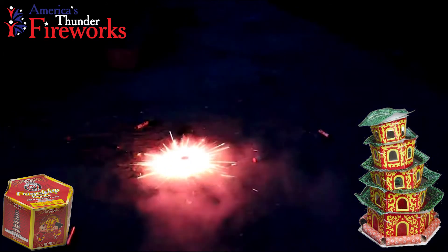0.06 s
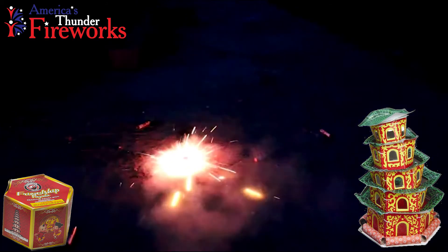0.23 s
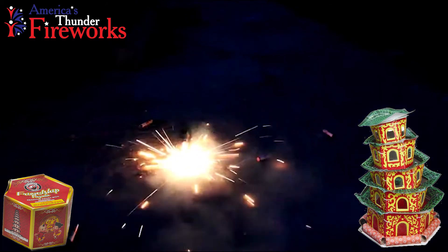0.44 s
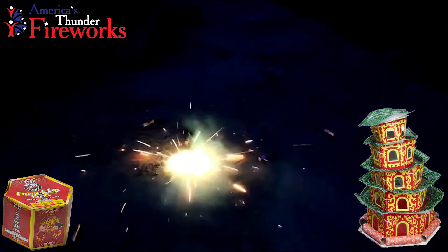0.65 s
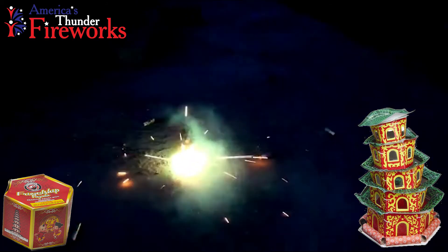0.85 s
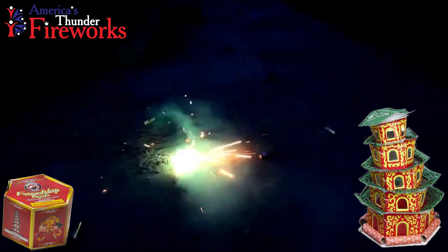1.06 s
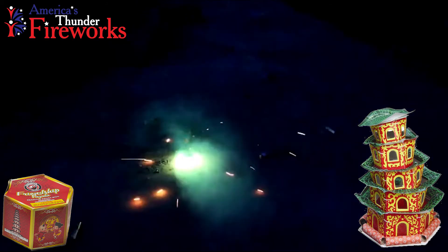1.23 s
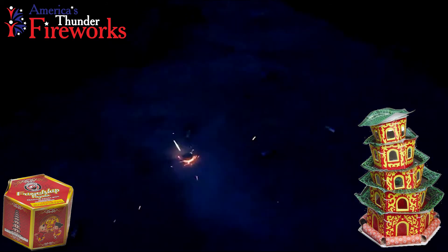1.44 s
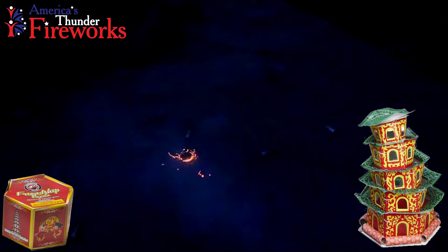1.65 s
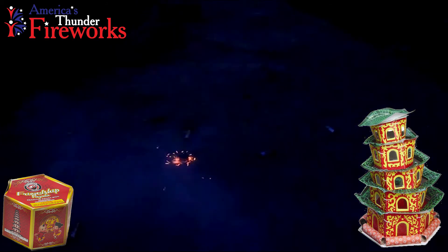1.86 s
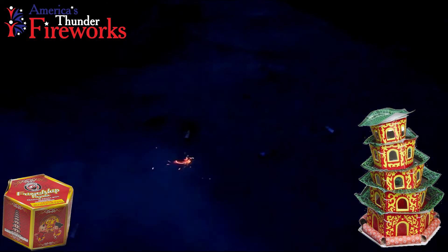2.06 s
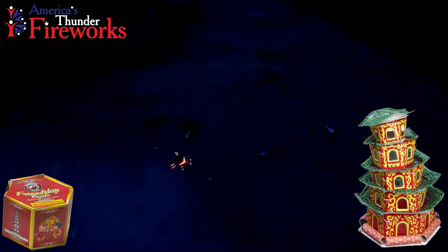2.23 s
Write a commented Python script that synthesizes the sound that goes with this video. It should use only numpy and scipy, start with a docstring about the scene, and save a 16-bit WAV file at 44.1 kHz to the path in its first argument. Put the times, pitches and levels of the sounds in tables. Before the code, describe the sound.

A ground spinner firework whirls with a fast pulsing hiss, then drops to a lower rush and sputters out in crackles. Sharp pops echo briefly in a paved lane at night, the loudest overloading the microphone.

```python
"""A paved lane at night: a ground spinner firework burns out. Its whirling jet hisses, one pulse a turn,
then slows to a low rush that breaks up into a sputter of tiny shocks and a few last cracks.
Lumps of powder pop on the way; the ground mirrors each, nearby walls echo it,
and the loudest overload the microphone. Faint night noise lies underneath."""
import sys
import numpy as np
from scipy import signal
from scipy.fft import rfft, irfft, next_fast_len
from scipy.io import wavfile
from scipy.ndimage import map_coordinates

SR = 44100
rng = np.random.default_rng(int(sys.argv[2]) if len(sys.argv) > 2 else 0)


def to_wav(s):
    """Save 16-bit WAV."""
    ch = np.atleast_2d(s).T  # columns
    pcm = np.round(np.clip(ch, -1, 1) * 32767)  # PCM
    wavfile.write(sys.argv[1], SR, pcm.astype(np.int16))


N = 101429

# casing spin, nozzle facing the listener at whole turns: time_s, turns
SPIN_TURNS = [(0, -.15), (.05, .95), (.1, 2.45), (.3, 8.35), (.48, 13.3), (.65, 18.25), (.75, 20.6),
              (.9, 24.5), (1.03, 27.3), (1.2, 31.1), (1.5, 35)]
# jet hiss: time_s, level_db
JET_LEVEL = [(0, -26), (.2, -25.5), (.32, -28.5), (.43, -26.5), (.52, -31), (.62, -26.5), (.78, -26),
             (.9, -25), (1.01, -23), (1.07, -33), (1.2, -35), (1.35, -44), (2.05, -85)]
# hiss swing over a turn: time_s, swing_db
JET_SWING = [(0, 1.5), (.25, 2.2), (.55, 2), (.72, 4.2), (.96, 4.4), (1.2, 1.5)]
# jet hiss: freq_hz, level_db
JET_SPECTRUM = [(300, -31), (1200, -14.5), (2200, -8), (3200, 0.5), (4500, -1), (6400, -2.5), (9000, -7.5),
                (12000, -14), (15500, -21)]
# powder pops: start_s, thump_db, pitch_hz, thump_t60_s, crack_db, crack_width_ms, burst_db, tail_db
POWDER_POPS = [(0.2216, -3.5, 162, 0.041, -0.5, 0.076, -20, -35),
               (0.4021, 19.5, 279, 0.019, 14.5, 0.37, -19, -7.5),
               (0.6995, -6.5, 134, 0.039, -35, 0.2, -32, -25.5),
               (.875, -26, 176, 0.028, -21, 0.31, -19, -29), (1.018, 8, 287, .021, 14, 0.186, 5, -11),
               (1.7649, 2.5, 259.9, .014, 9, 0.44, -3, -18.5),
               (2.016, -8.5, 174, 0.029, -33, 0.14, -43, -28.5)]
# gas burst of a pop: freq_hz, level_db
BURST_SPECTRUM = [(30, -16), (150, -14), (280, -8.5), (430, 0), (560, 6.5), (800, -8), (1000, -10.5),
                  (1450, -4), (2200, -23), (5000, -22.5), (10000, -58)]
# scattered tail of a pop: freq_hz, level_db
TAIL_SPECTRUM = [(40, -55), (130, -11), (280, 7.5), (480, 3.5), (800, -13), (1500, -12), (3000, -18),
                 (9000, -60)]
# nearby walls: delay_s, gain_db
WALL_ECHOES = [(.017, -26.5), (.031, -46), (.049, -41), (0.066, -27.5)]
# sputter before trim: time_s, level_db
SPUTTER_LEVEL = [(1.07, -33), (1.2, -25.5), (1.286, -18.5), (1.42, -16), (1.5, -19), (1.525, -18),
                 (1.565, -25.5), (1.602, -15.5), (1.68, -20.5), (1.728, -15), (1.785, -23), (1.81, -24),
                 (1.85, -19), (1.88, -21), (1.91, -20.5), (1.945, -22.5), (1.983, -17.5), (2.007, -21),
                 (2.025, -28)]
# sputter shocks: time_s, rate_per_s, width_ms
SPUTTER_GRAIN = [(0, 490, 0.095), (1.1, 1900, 0.062), (1.3, 2990, 0.14), (1.45, 2870, .12),
                 (1.55, 870, 0.065), (1.61, 1380, 0.07), (1.72, 2270, 0.065), (1.85, 900, .06),
                 (1.98, 894, 0.067)]
# ember cracks: start_s, level_db, width_ms
EMBER_CRACKS = [(1.1601, -7, 0.17), (1.4195, -3, 0.15), (1.5152, -2, 0.063), (1.528, -11, 0.046),
                (1.55, -3, .06), (1.6053, 3, 0.041), (1.9195, -1.5, 0.047), (2.0126, -13, 0.037),
                (2.017, -2.5, 0.075), (2.021, -5.5, 0.083), (2.0903, -6, 0.059), (2.1125, -3.5, 0.069),
                (2.116, -8.5, 0.077), (2.1242, -4.5, .06), (2.129, -9, 0.08), (2.1361, -2.5, 0.079),
                (2.1795, -5, 0.074), (2.2516, -18, .1), (2.2559, -12.5, 0.26)]
# flame roar: time_s, level_db
ROAR_LEVEL = [(0, -40), (.08, -27), (.17, -31), (.33, -32), (.5, -32.5), (.62, -35), (.77, -31),
              (.87, -22.5), (.97, -25), (1.08, -31), (1.28, -23), (1.45, -26), (1.6, -27.5), (1.85, -32.5),
              (2.01, -35), (2.08, -38), (2.3, -46)]
# flame roar: freq_hz, level_db
ROAR_SPECTRUM = [(60, -50), (130, -2), (260, 1.5), (480, -4), (750, -7), (1200, -5.5), (2200, -13.5),
                 (4000, -13.5), (10000, -57)]
# flame billows: time_s, level_db
BILLOW_LEVEL = [(0, -35), (.3, -36), (.7, -31), (1.1, -33.5), (1.3, -27.5), (1.6, -41.5), (1.9, -47),
                (2.3, -51)]
# flame billows: freq_hz, level_db
BILLOW_SPECTRUM = [(25, 5.5), (60, 9.5), (120, 5.5), (200, 0.5), (400, -10), (1000, -72)]
# night noise: freq_hz, level_db
NIGHT_SPECTRUM = [(25, -26), (80, -7.5), (200, -6.5), (400, -12.5), (800, -13), (1500, -18), (5000, -23.5),
                  (10000, -37), (13000, -56)]

GROUND_DELAY_S = 0.0036
TIME_S = np.arange(N) / SR


def amp(db):
    """Decibels to gain."""
    return 10 ** (np.asarray(db) / 20)


def unit_rms(x):
    """Scale to rms 1."""
    return x / np.sqrt(np.mean(x ** 2) + 1e-20)


def curves(table):
    """Per-sample curve of each column after time_s."""
    time_s, *columns = np.transpose(table)
    return [np.interp(TIME_S, time_s, column) for column in columns]


def wobble(rate_hz):
    """Smooth curve through unit-variance random knots."""
    knots = rng.standard_normal(int(N * rate_hz / SR) + 4)
    return map_coordinates(knots, [TIME_S * rate_hz])


def filtered(x, response):
    """Apply the gain response(freq_hz)."""
    size = next_fast_len(N + 8192)
    return irfft(rfft(x, size) * response(np.fft.rfftfreq(size, 1 / SR)), size)[:N]


def noise(spectrum):
    """Coloured noise, rms 1."""
    freq_hz, level_db = np.transpose(spectrum)
    white = rng.standard_normal(N)
    return unit_rms(filtered(white, lambda hz: amp(np.interp(np.log(hz + 1), np.log(freq_hz), level_db))))


def delayed(x, delay_s):
    """Constant or moving delay."""
    return map_coordinates(x, [np.arange(N) - delay_s * SR], order=3)


def butterworth(x, kind, order, cut_hz):
    """Causal low- or high-pass."""
    return signal.sosfilt(signal.butter(order, cut_hz, kind, fs=SR, output="sos"), x)


def shocks(start_s, gain, width_ms):
    """Tiny blast waves: sharp spike, shallow rebound."""
    index = (start_s * SR).astype(int)[:, None] + np.arange(160)
    age_ms = np.maximum(index / SR - start_s[:, None], 0) * 1000
    age = age_ms / width_ms[:, None]
    shape = age * (age - 2) * np.exp(-age) / 0.46  # spike of -1
    train = np.bincount(np.clip(index, 0, N).ravel(), (gain[:, None] * shape).ravel(), N + 1)[:N]
    return butterworth(train, "lowpass", order=5, cut_hz=9070)


def jet_hiss(skim_ms=0.5313, skim_swing_ms=0.1515, flutter_db=1.3):
    """The jet swings past once a turn; its reflection off the paving sweeps through it."""
    (turns,), (level_db,), (swing_db,) = curves(SPIN_TURNS), curves(JET_LEVEL), curves(JET_SWING)
    angle_rad = 2 * np.pi * turns
    direct = noise(JET_SPECTRUM)
    reflected = 0.4 * delayed(direct, (skim_ms - skim_swing_ms * np.sin(angle_rad)) / 1000)
    envelope = amp(level_db + swing_db * np.cos(angle_rad) + flutter_db * wobble(rate_hz=260))
    return unit_rms(direct + reflected) * envelope


def powder_pops(rise_s=0.00028, burst_t60_s=0.046, near_t60_s=0.16,
                far_delay_s=0.027, far_db=-16, far_t60_s=0.43):
    """Thump, crack and gas burst, mirrored by the ground, echoed by walls and scattered."""
    direct, scattered = np.zeros(N), np.zeros(N)
    for start_s, thump_db, pitch_hz, thump_t60_s, crack_db, crack_ms, burst_db, tail_db in POWDER_POPS:
        age_s = np.maximum(TIME_S - start_s, 0)
        thump_envelope = amp(thump_db - 60 * age_s / thump_t60_s) * (1 - np.exp(-age_s / rise_s))
        thump = thump_envelope * np.sin(2 * np.pi * pitch_hz * age_s)
        crack = shocks(np.array([start_s]), amp([crack_db]), np.array([crack_ms]))
        burst = amp(burst_db - 60 * age_s / burst_t60_s) * noise(BURST_SPECTRUM) * (age_s > 0)
        direct += thump + crack + burst
        near = amp(-60 * age_s / near_t60_s) * (age_s > 0)
        far = amp(far_db - 60 * (age_s - far_delay_s) / far_t60_s) * (age_s > far_delay_s)
        scattered += amp(tail_db) * noise(TAIL_SPECTRUM) * (near + far)
    blast = direct + 0.33 * delayed(direct, GROUND_DELAY_S)
    echoes = sum(amp(gain_db) * delayed(blast, delay_s) for delay_s, gain_db in WALL_ECHOES)
    return blast + echoes + scattered


def sputter(onset_s=1.07, end_s=2.024, early_db=-39.5, trim_db=-0.5, clump_db=3.5, size_scatter_db=7):
    """Dense, broad shocks make a rush; sparser, sharper ones crackle in clumps."""
    (rate_per_s, width_ms), (level_db,) = curves(SPUTTER_GRAIN), curves(SPUTTER_LEVEL)
    count = np.cumsum(rate_per_s * amp(clump_db * wobble(rate_hz=140))) / SR
    jitter, size, spread = rng.standard_normal((8000, 3))[:int(count[-1])].T
    start_s = np.interp(np.arange(len(jitter)) + 0.592 * jitter, count, TIME_S)
    gain = amp(size_scatter_db * np.minimum(size, 1))
    shock_ms = np.interp(start_s, TIME_S, width_ms) * np.exp(0.24 * spread)
    direct = shocks(start_s, gain, shock_ms)
    reflected = 0.41 * delayed(direct, GROUND_DELAY_S + 0.000526 * wobble(rate_hz=40))
    train = butterworth(direct + reflected, "highpass", order=1, cut_hz=256)
    levelled = unit_rms(train / np.sqrt(rate_per_s * width_ms))
    envelope = amp(np.where(TIME_S < onset_s, early_db, level_db + trim_db)) * (TIME_S < end_s)
    return levelled * envelope


def ember_cracks():
    """Single shocks from the embers, each doubled by the ground."""
    start_s, level_db, width_ms = np.transpose(EMBER_CRACKS)
    direct = shocks(start_s, amp(level_db), width_ms)
    return direct + 0.35 * delayed(direct, GROUND_DELAY_S)


def flame(flutter_db=2.76, waver_db=2.5):
    """Burning powder roars and flutters over slow, deep billows."""
    (roar_db,), (billow_db,) = curves(ROAR_LEVEL), curves(BILLOW_LEVEL)
    roar = noise(ROAR_SPECTRUM) * amp(roar_db + flutter_db * wobble(rate_hz=60.78))
    billows = noise(BILLOW_SPECTRUM) * amp(billow_db + waver_db * wobble(rate_hz=11))
    return roar + billows


def night(level_db=-35):
    """Faint, steady, mostly low noise."""
    return amp(level_db) * noise(NIGHT_SPECTRUM)


def scene():
    """Firework over night noise, mono."""
    return (night() + jet_hiss() + flame() + sputter() + ember_cracks() + powder_pops())[None]


def record(dry):
    """Microphone: bass cut, clipping at full scale, band limit."""
    hardness, top_hz = 16, 15900
    thinned = butterworth(dry[0], "highpass", order=2, cut_hz=126)
    clipped = thinned / (1 + np.abs(thinned) ** hardness) ** (1 / hardness)
    return filtered(clipped, lambda hz: hz < top_hz)[None]


dry = scene()
out = record(dry)
to_wav(out)
```